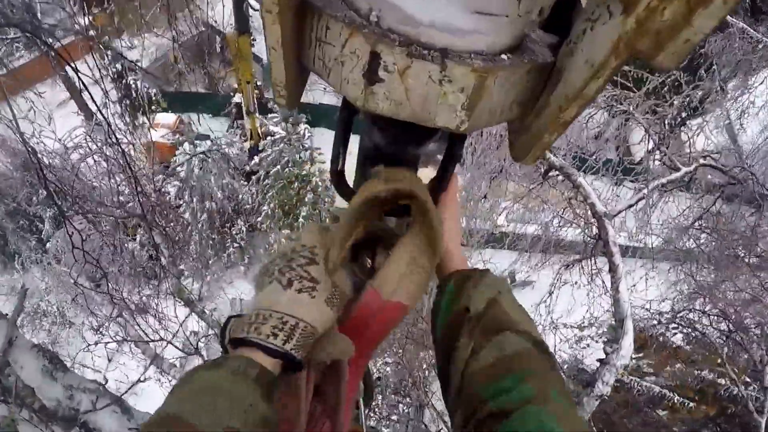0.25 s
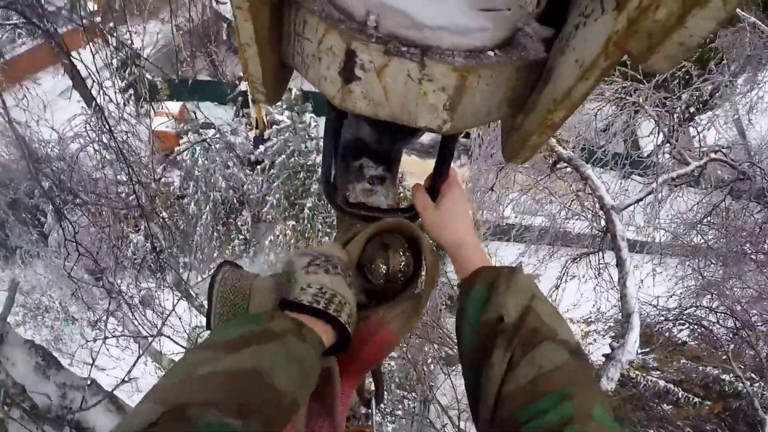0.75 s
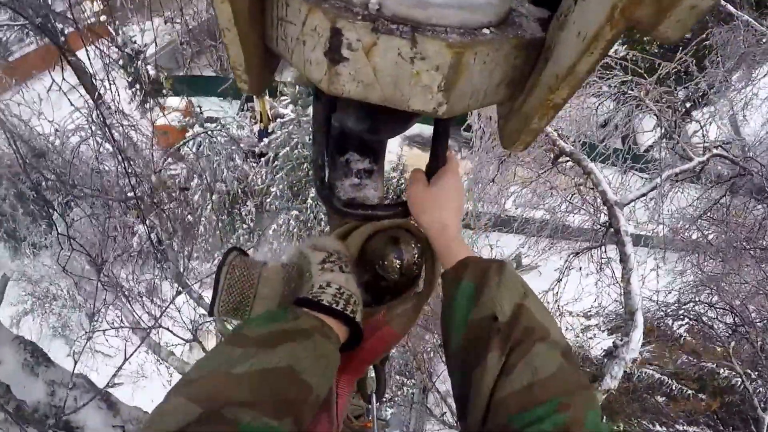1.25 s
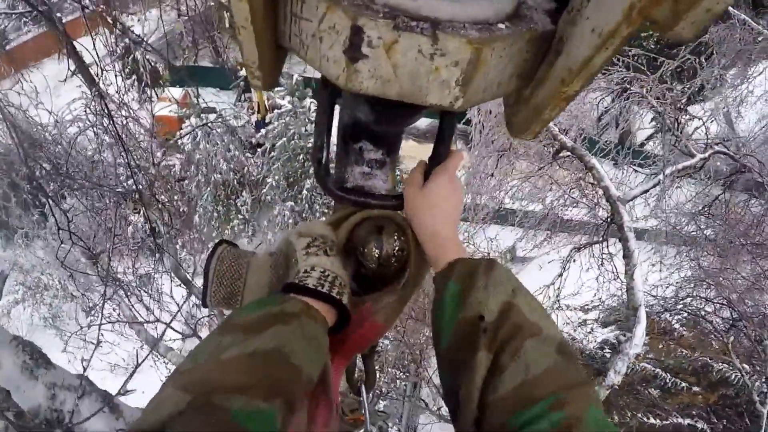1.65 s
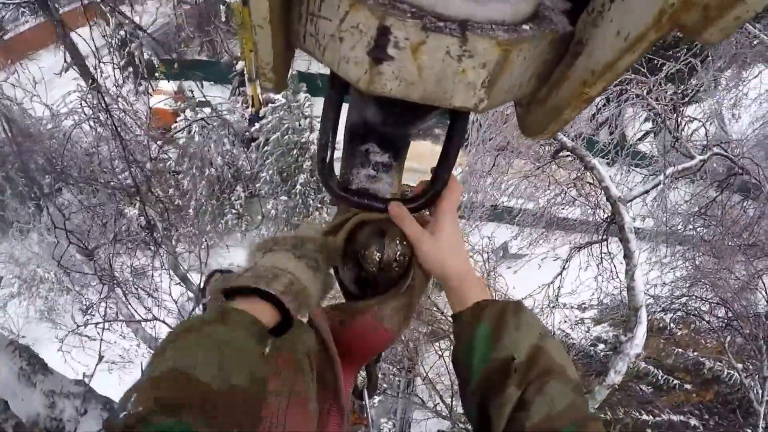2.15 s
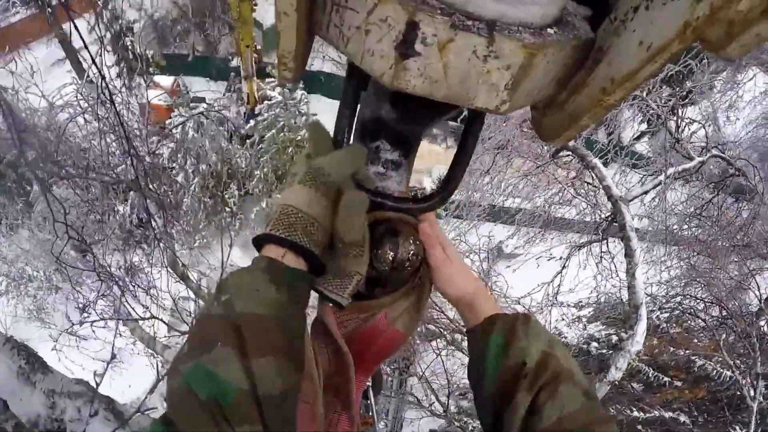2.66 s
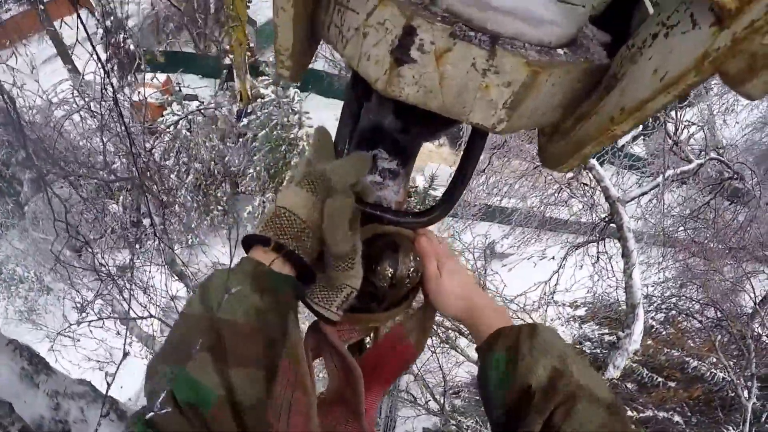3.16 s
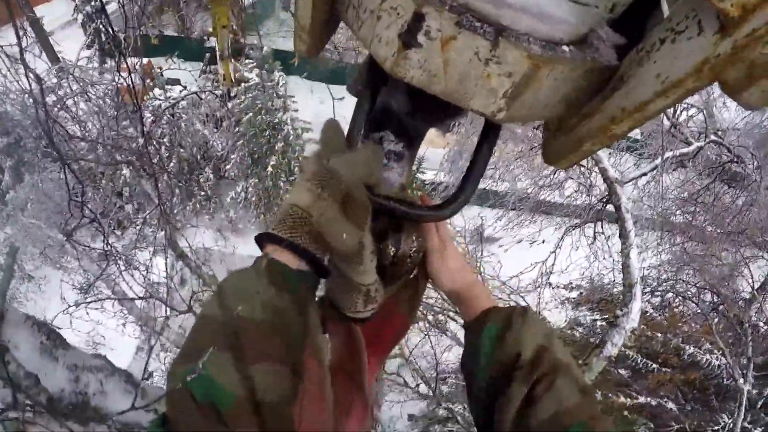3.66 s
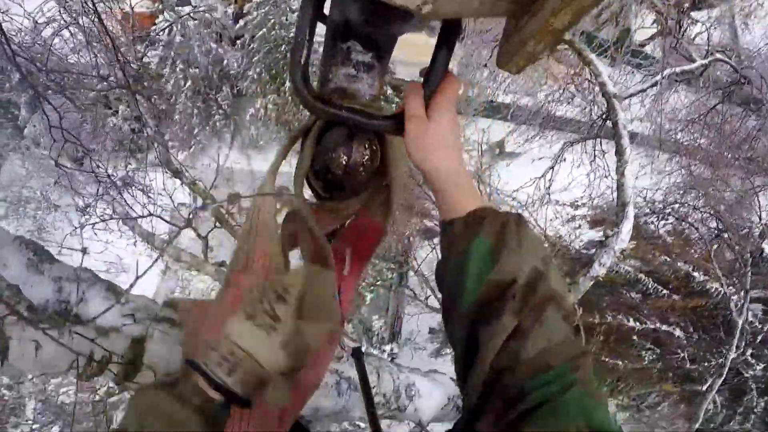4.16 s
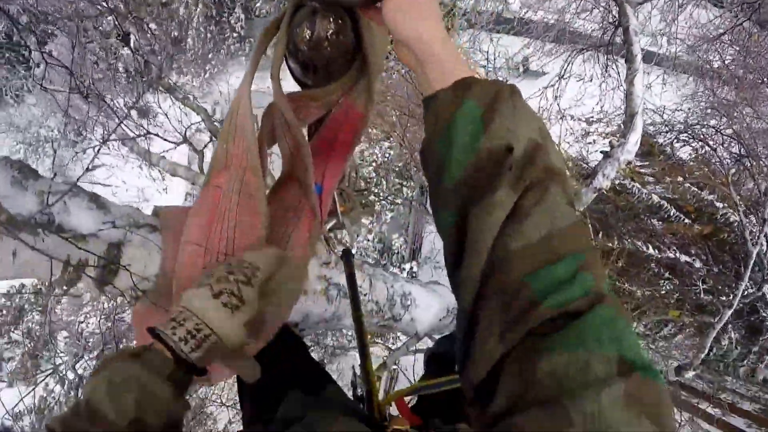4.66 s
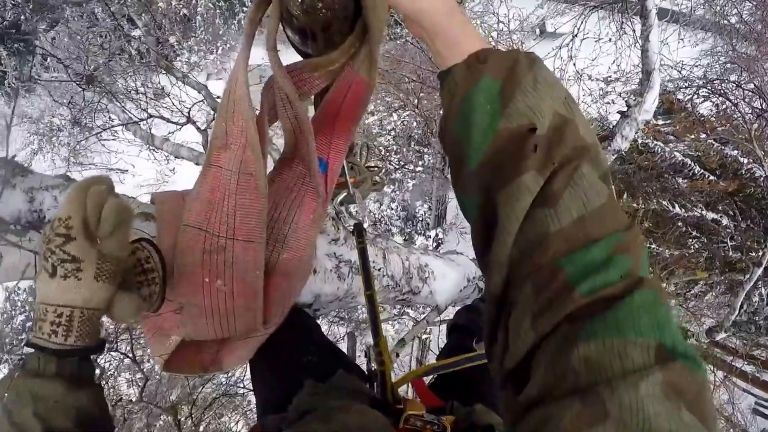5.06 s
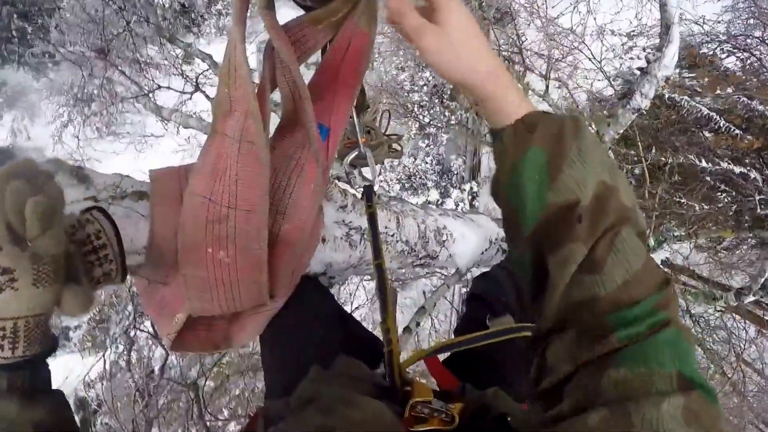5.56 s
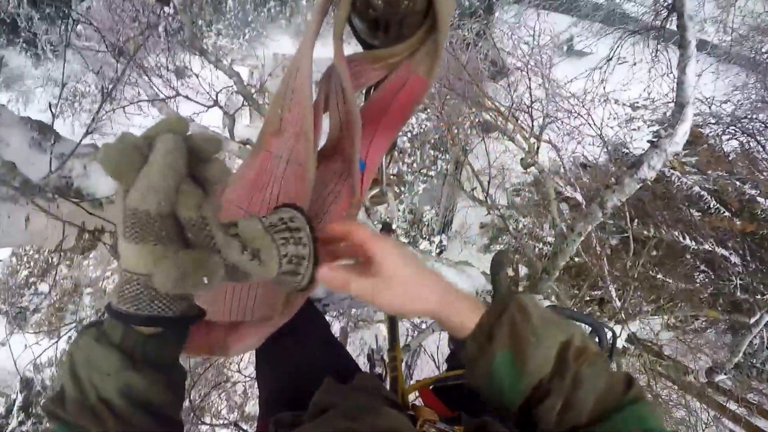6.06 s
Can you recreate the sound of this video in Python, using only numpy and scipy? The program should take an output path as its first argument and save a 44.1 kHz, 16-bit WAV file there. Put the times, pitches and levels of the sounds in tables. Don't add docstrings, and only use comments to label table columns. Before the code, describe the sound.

Close outdoor metal clack rings briefly, followed by two weaker rebounds, with soft glove knocks, tiny ticks, low wind buffeting and a faraway idling engine.

```python
import sys
import numpy as np
from scipy import signal
from scipy.fft import rfft, irfft, next_fast_len
from scipy.io import wavfile
from scipy.ndimage import uniform_filter1d

SR = 44100
rng = np.random.default_rng(int(sys.argv[2]) if len(sys.argv) > 2 else 0)


def wav_out(sig):
    wavfile.write(sys.argv[1], SR, np.round(np.clip(np.atleast_2d(sig).T, -1, 1) * 32767).astype(np.int16))


def ratio(d):
    e = np.asarray(d, float) / 20
    return 10 ** e


N = 278264

# (time [s], hook level [dB], latch and pin level [dB], delay of the treble modes [s])
BLOWS = [
    (3.579, 0, 0, 0.0067),
    (4.012, 1.5, 0, 0.014),
    (4.446, -2.5, -24, .012),
    (.37, -39, -40, .01),
]
BLOW_SPOTS = [0, 1, 1, 0]
HOOK_HZ = [576, 1010, 1212, 1588, 1803, 1910]
LATCH_HZ = [2472, 3403, 3850, 3983, 4194, 4592, 4971, 5828, 6464, 6846, 7141, 7620]
PIN_HZ = [8633, 8762, 9439, 10070, 10871, 11890, 12956, 13776, 13899, 14375, 15056]
# (level [dB], T60 [s], level [dB], T60 [s])
HOOK_RING = [(-34.5, .18, -57, 0.81), (-29.5, 0.19, -46.5, 0.4), (-39, .37, -50, 1.7),
             (-39, .18, -65, 1.05), (-20.5, .18, -49, 0.47), (-37.5, 1.4, -40, 0.77)]
LATCH_RING = [(-12.5, 0.071, -30, .2), (-6, .22, -22, 0.42), (-33.5, .25, -31.5, .37),
              (-29.5, .18, -45, .25), (-24.5, .15, -56, .27), (-18.5, 0.18, -36, .2), (-19, .14, -26, 0.15),
              (-26.5, .17, -51, .16), (-17, 0.13, -31, 0.13), (-29.5, 0.18, -32, 0.15),
              (-26, .15, -37, 0.14), (-27.5, .22, -53, 0.7)]
PIN_RING = [(-33, .15, -46, .26), (-31, .14, -47, .3), (-22.5, 0.14, -48, .21), (-20.5, .126, -53, .15),
            (-36.5, .12, -58, .17), (-37, .16, -49, 0.4), (-36.5, .15, -48, .28), (-37.5, .15, -54.5, .2),
            (-34.5, .16, -55, .21), (-37.5, .15, -58, .22), (-39, .16, -56, .16)]
# (level [dB], T60 [s], share of the upper twin [ratio, negative = opposed], T60 of that share [s])
TWINS = [
    (-20, .5, -1.3, 1.05),
    (-25, 0.77, 0.39, 1.8),
    (-32, 0.39, 0.79, 0.54),
    (-59, 0.22, .12, .5),
]
# (free at [s], level [dB], seated at [s], level [dB], choke [dB/s])
SEATING = [
    (0.072, 4.5, 0.23, -4, 800),
    (0.08, 4, 0.13, -8, 110),
    (.1, 3, 0.11, -.6, 130),
    (.04, -1, .06, -11, 700),
]
# (time after the blow [s], peak [dB], centre [Hz], width [octaves], T60 [s])
CRACK = [(-.0005, -10.5, 2700, 0.31, 0.061), (-0.00075, -16.5, 3500, 0.96, .08),
         (.004, -9, 2600, 0.61, .012), (.003, -22, 6000, 0.44, 0.12), (0.017, -31, 3000, .35, .27),
         (.011, -25.5, 11000, .45, .12), (.001, -33, 1050, .5, .1), (.002, -46.5, 190, 0.54, .13)]
# (level [dB], brightness [dB/octave])
FORCE = [
    (0.5, 0.6),
    (-18, 1),
    (-29.5, -2.5),
]
# (time [s], peak [dB], pitch [Hz], T60 [s])
SINGLE_PITCHES = [(3.581, -23.5, 2600, .16), (3.58, -24, 1600, 0.07), (3.755, -51.5, 3403, 0.42),
                  (4.014, -32, 2363, 0.14), (4.016, -35, 5130, 0.18), (4.457, -46.5, 4980, 0.093),
                  (4.448, -42, 4700, 0.07), (4.455, -52, 3553, .3), (4.447, -52, 3480, .3), (3.582, -27, 3528, .2),
                  (3.583, -29, 5660, .16), (3.583, -27, 2472, .2), (3.581, -36, 1180, .2), (4.449, -54, 3850, .35),
                  (.372, -56, 3850, .12), (.371, -54, 4592, .1)]
# (time [s], peak [dB], centre [Hz], T60 [s])
REBOUNDS = [(3.608, -24, 5200, .11), (3.632, -34, 5460, 0.12), (3.69, -51.5, 5440, .22),
            (3.75, -51, 5000, 0.12), (3.776, -59, 6000, .15), (4.016, -34, 5340, 0.16),
            (4.027, -39, 9500, 0.093), (4.043, -33, 6840, 0.063), (4.06, -45, 6000, .13),
            (4.078, -43, 4500, .065), (4.092, -50, 4800, .06), (4.105, -58, 5000, .15),
            (4.459, -44, 6000, .06), (4.482, -63, 8000, .05), (4.5376, -47, 2800, .06),
            (4.548, -58, 5300, 0.042), (4.4473, -36.5, 2100, .05), (4.447, -48, 6500, .035),
            (4.012, -40, 6300, .05), (4.381, -54, 2500, .05), (4.0125, -36, 1500, .06),
            (4.447, -47, 1200, .06), (4.538, -55, 4800, .04)]
# (time [s], peak [dB], centre [Hz], width [octaves], T60 [s])
TICKS = [(.194, -52, 3000, .6, .04), (.195, -54, 5000, 0.14, 0.044), (.2324, -55, 4200, 0.5, 0.035),
         (.2538, -53, 4900, .2, 0.044), (.256, -51, 3280, .3, 0.06), (.304, -53, 3200, 0.37, 0.095),
         (.369, -44.5, 4500, 0.46, 0.06), (.372, -49, 2200, 0.37, .08), (.379, -50, 7000, 0.82, 0.059),
         (.565, -63, 9000, .9, .19), (.579, -66, 7000, .9, .12), (1.872, -52, 2390, .7, 0.17),
         (2.698, -57, 3200, .6, .04), (3.533, -51, 4800, 0.52, 0.054), (4.3415, -45.5, 11000, 0.99, 0.028),
         (4.36, -65, 12000, .5, .03), (5.45, -51, 3570, .3, .04)]
# (time [s], peak [dB], centre [Hz], width [octaves], T60 [s])
KNOCKS = [(0.551, -39.5, 850, 0.31, 0.038), (1.67, -46, 966, 0.31, .05), (1.891, -44, 1080, 0.23, 0.047),
          (2.764, -37, 1104, 0.34, 0.049), (3.09, -50, 790, 0.34, 0.045), (3.167, -44, 1107, .35, 0.046),
          (3.415, -42, 1150, .35, 0.037)]
# (time [s], clatter level [dB], side cover level [dB])
DIESEL = [(0.0, -56.5, -7), (1.2, -56, -9.5), (2.16, -56.5, -6.5), (2.48, -57, -7.5), (2.76, -54.5, -7),
          (3.42, -56, -6.5), (3.88, -55, -7), (4.32, -55, -8), (4.75, -54.5, -10), (5.43, -55.5, -12),
          (5.75, -57, -14), (6.06, -52.5, -11), (6.31, -55.5, -9.5)]
# (frequency [Hz], width [Hz], level [dB])
BLOCK = [(951, 100, -14.5), (1015.5, 83, -3), (1104, 37, 0), (1192, 81, 0), (1311, 57, 1.5),
         (1830, 55, -0.5), (1941, 25, 1), (2360, 47, -5), (2485, 169, -2), (2856, 250, -2), (3413, 190, -9),
         (4500, 1000, -17.5), (5300, 300, -32.5), (3200, 95, -11)]
# (frequency [Hz], width [Hz])
SIDE_COVER = (1577, 180)
# (time [s], buffet level [dB])
GUSTS = [(0.0, -40.5), (0.4, -46.5), (0.6, -39.5), (1.03, -47.5), (1.74, -37.5), (1.77, -47.5), (2.0, -38),
         (2.07, -53), (2.14, -37.5), (2.27, -50), (2.41, -41.5), (2.51, -48), (3.36, -34), (3.44, -40.5),
         (4.01, -41.5), (5.22, -54), (5.8, -46.5), (6.31, -49.5)]
# (time [s], lift [dB])
PUFFS = [(.18, 11.5), (.47, 6.5), (1.34, 4), (2.0, 4), (2.78, 8), (3.11, 3), (3.3, 4), (3.6, 6), (3.76, 7),
         (4.83, 9.5), (5.29, 5.5), (5.41, 4), (5.7, 7), (5.86, 10.5)]
# (frequency [Hz], level [dB per Hz])
BUFFET = [(2.9, -26), (5.0, -1), (16, 0.5), (28, -0.5), (47, -9), (70, -22.5), (91, -50), (150, -120)]
RUMBLE = [(32, -30.5), (55, -3.5), (70, -6.5), (102, -8.5), (124, -17.5), (183, -35.5), (290, -48),
          (480, -120)]
HISS = [(120, -12), (180, 0.5), (400, -3.5), (800, -5.5), (3000, -6), (6000, -14), (13000, -20),
        (15500, -23)]
# (from [s], to [s], above [Hz], level [dB])
TREBLE_DIPS = [
    (3.568, 3.574, 600, -22),
    (4.343, 4.345, 6500, -15),
]

TWIN_HZ, TWIN_SPLIT_HZ = 2693, 8.5
TREBLE_HZ = 6000
FIRST_CONTACT_DB, FIRST_CONTACT_S = -8.5, .004
PITCH_OCTAVES, REBOUND_OCTAVES = .006, 0.4
THUD_DB, THUD_HZ, THUD_T60_S = -56.5, 235, .2
ECHO_DB, ECHO_T60_S, ECHO_GAP_S = -35, .6, .03
FIRING_HZ = 44.6
DIESEL_DB_PER_OCTAVE, BRIGHTENS_PER_S = -2.6, 0.24
BUFFET_DB, RUMBLE_DB, RUMBLE_FOLLOWS, PUFF_S = 2.5, -44, 0.29, 0.032
HISS_DB = -63
WHINE_HZ, WHINE_DB, WHINE_DUTY = 8570, -70.5, 0.47
FRAME_HZ, FRAME_START_S = 59.94, .0107
TOP_HZ, CEILING = 15250, .95


def level(x, db):
    return x * ratio(db) / np.sqrt(np.mean(x ** 2))


def columns(rows):
    s, *values = np.transpose(rows)
    return [np.interp(np.arange(N) / SR, s, v) for v in values]


def coloured(points):
    hz, db = np.transpose(points)
    size = next_fast_len(N)
    f = np.arange(size // 2 + 1) * SR / size + 1e-3
    gain = ratio(np.interp(np.log(f), np.log(hz), db, left=-90, right=-90))
    return level(irfft(rfft(rng.standard_normal(size)) * gain, size)[:N], 0)


def walk(rate):
    k = int(SR / rate)
    steps = np.repeat(rng.standard_normal(N // k + 1), k)
    return 1.3 * uniform_filter1d(uniform_filter1d(steps, k), k)[:N]


def add(out, s, sound):
    i = int(s * SR)
    out[i:i + len(sound)] += sound[:N - i]


def fade(t, t60):
    return ratio(-60 * t / np.clip(t60, .02, 2))


def latch():
    out, t = np.zeros(N), np.arange(SR // 2) / SR
    pitches = np.array(HOOK_HZ + LATCH_HZ + PIN_HZ)
    grips = np.minimum(pitches / 1900, 1) ** 3
    spots = np.reshape(HOOK_RING + LATCH_RING + PIN_RING, (len(pitches), -1, 2))
    for blow, spot, twin, seat in zip(BLOWS, BLOW_SPOTS, TWINS, SEATING):
        s, hook_db, latch_db, delay_s = blow
        twin_db, twin_t60, share, share_t60 = twin
        free_s, top_db, seated_s, seated_db, choke = seat
        phases = 2 * np.pi * rng.random(len(pitches))
        late = np.clip((t - delay_s) / 0.0014, 0, 1)

        free_db = np.interp(t, [0, FIRST_CONTACT_S, free_s, seated_s],
                            [FIRST_CONTACT_DB, -1.5, top_db, seated_db])
        free_db = np.maximum(free_db - choke * np.maximum(t - seated_s, 0), -40)

        ring = np.zeros(len(t))
        for hz, grip, (db, t60), phase in zip(pitches, grips, spots[:, spot], phases):
            blow_db = hook_db if hz in HOOK_HZ else latch_db
            mode = np.sin(2 * np.pi * hz * t + phase) * fade(t, t60)
            onset = late if hz > TREBLE_HZ else 1
            ring += ratio(db + blow_db + grip * free_db) * mode * onset

        upper = np.sin(2 * np.pi * (TWIN_HZ + TWIN_SPLIT_HZ) * t)
        pair = np.sin(2 * np.pi * TWIN_HZ * t) + share * fade(t, share_t60) * upper
        ring += ratio(twin_db + free_db) * fade(t, twin_t60) * pair
        add(out, s, ring * np.minimum(t / 0.0008, 1) * np.minimum((t[-1] - t) / .08, 1))
    return out


def rattle():
    rows = []
    for blow, (force_db, bright_db) in zip(BLOWS, FORCE):
        for s, db, hz, octaves, t60 in CRACK:
            peak_db = db + force_db + bright_db * np.log2(hz / 2700)
            rows.append((blow[0] + s, peak_db, hz, octaves, t60))
    rows += [(s, db, hz, PITCH_OCTAVES, t60) for s, db, hz, t60 in SINGLE_PITCHES]
    rows += [(s, db, hz, REBOUND_OCTAVES, t60) for s, db, hz, t60 in REBOUNDS]
    rows.append((BLOWS[1][0], THUD_DB, THUD_HZ, REBOUND_OCTAVES, THUD_T60_S))
    return rows


def contacts(rows, rise_s, metal_db, lumpy_db, chatter_db):
    out, t = np.zeros(N), np.arange(8192) / SR
    f = np.arange(1, len(t) // 2 + 2) * SR / len(t)
    modes = ratio(metal_db * np.minimum(rng.exponential(size=len(f)), 5))
    draws = rng.standard_normal((len(rows), 3, len(t)))
    for (s, db, hz, octaves, t60), (noise, spot, bump) in zip(rows, draws):
        favour = np.interp(f, np.arange(50) * 453.0, spot[:50])
        colour = ratio(np.clip(lumpy_db, 0, 3.5) * favour)
        bell = np.exp(-.5 * (np.log2(f / hz) / max(octaves, .003)) ** 2)
        band = irfft(rfft(noise) * modes * colour * bell)
        bumps = np.interp(t, np.arange(100) * 0.0027, bump[:100])
        chatter = ratio(chatter_db * bumps * np.minimum(t / .006, 1))
        decay = ratio(-60 * t / max(t60, .01))
        add(out, s, level(band, db - 1) * chatter * np.minimum(t / rise_s, 1) * decay)
    return out


def echo(x):
    t = np.arange(SR // 2) / SR
    gap = np.clip(t / ECHO_GAP_S - 1, 0, 1)
    tail = rng.standard_normal(len(t)) * ratio(-60 * t / ECHO_T60_S) * gap
    return signal.fftconvolve(x, tail * ratio(ECHO_DB) / np.sqrt(np.sum(tail ** 2)))[:N]


def knocks():
    out, t = np.zeros(N), np.arange(4096) / SR
    spreads = rng.uniform(-0.99, 1, (len(KNOCKS), 7))
    for (s, db, hz, octaves, t60), spread in zip(KNOCKS, spreads):
        pitches = hz * 2 ** (2 * octaves * (np.linspace(-1, 1, 7) + spread / 7))
        modes = np.sin(2 * np.pi * pitches[:, None] * t + .8 * spread[::-1, None])
        ring = np.hanning(9)[1:-1] @ modes
        decay = ratio(-60 * t / max(t60, .01))
        add(out, s, ratio(db - 5.5) * ring * np.minimum(t / .0004, 1) * decay)
    return out


def diesel():
    clatter_db, cover_db = columns(DIESEL)
    phase = np.cumsum(FIRING_HZ * (1 + .003 * walk(3))) / SR
    strength = ratio(2.5 * rng.standard_normal(N // 500))[phase.astype(int)]
    clatter = (.7 + strength * np.exp(-(phase % 1) / .3)) * rng.standard_normal(N)
    tilt = DIESEL_DB_PER_OCTAVE + BRIGHTENS_PER_S * np.arange(N) / SR
    out, swell = np.zeros(N), walk(9)
    for hz, width_hz, db in BLOCK + [(*SIDE_COVER, cover_db)]:
        b, a = signal.iirpeak(hz, hz / (1.28 * width_hz), SR)
        ring = signal.lfilter(b, a, signal.lfilter(b, a, clatter))
        waver_db = 1.1 * swell + 1.1 * walk(4)
        out += ring * ratio(db + waver_db + tilt * np.log2(hz / 1500))
    return level(out, 0) * ratio(clatter_db)


def wind():
    gust_db, = columns(GUSTS)
    t = np.arange(N) / SR
    puff_db = sum(db * np.exp(-.5 * ((t - s) / PUFF_S) ** 2) for s, db in PUFFS)
    rumble_db = RUMBLE_DB + RUMBLE_FOLLOWS * gust_db + puff_db + 2.0 * walk(11)
    return coloured(BUFFET) * ratio(BUFFET_DB + gust_db) + coloured(RUMBLE) * ratio(rumble_db)


def electronics():
    frames = (np.arange(N) / SR - FRAME_START_S) * FRAME_HZ + 1
    slip, detune, size = rng.standard_normal((N // 700, 3))[frames.astype(int)].T
    gate = uniform_filter1d(1. * (frames % 1 < WHINE_DUTY), 60)
    phase = 2 * np.pi * (WHINE_HZ + 25 * detune) * (frames % 1) / FRAME_HZ + .8 * slip
    whine = gate * np.sin(phase) * ratio(WHINE_DB + 2.8 * size)
    return coloured(HISS) * ratio(HISS_DB) + whine


def scene():
    steel = latch() + contacts(rattle(), 0.0005, metal_db=5.0, lumpy_db=3.5, chatter_db=3.5)
    steel += contacts(TICKS, 0.0016, metal_db=7.0, lumpy_db=3.0, chatter_db=3.5)
    around = knocks() + diesel() + wind() + electronics()
    fade_in = np.minimum(np.arange(N) / (.008 * SR), 1)
    return ((steel + echo(steel) + around) * fade_in)[None]


def band_limit(x):
    return signal.sosfilt(signal.butter(12, 16510, fs=SR, output="sos"), x)


def record(dry):
    t = np.arange(N) / SR
    low_pass = signal.ellip(8, .2, 60, TOP_HZ, fs=SR, output="sos")
    x = signal.sosfilt(low_pass, CEILING * np.tanh(dry / CEILING))
    for start, end, hz, db in TREBLE_DIPS:
        treble = signal.sosfiltfilt(signal.butter(3, hz, "high", fs=SR, output="sos"), x)
        dip = uniform_filter1d(1. * ((t > start) & (t < end)), 40)
        x = x - (1 - ratio(db)) * dip * treble
    return band_limit(x)


dry = scene()
out = record(dry)
wav_out(out)
```